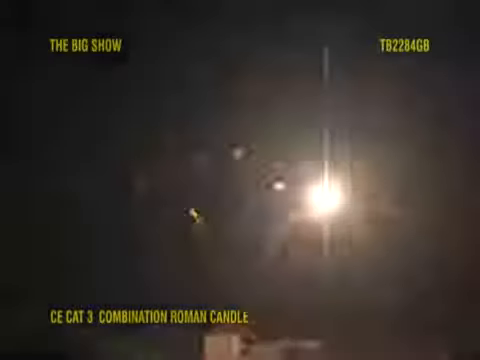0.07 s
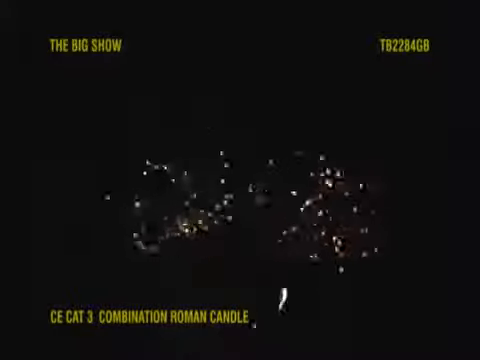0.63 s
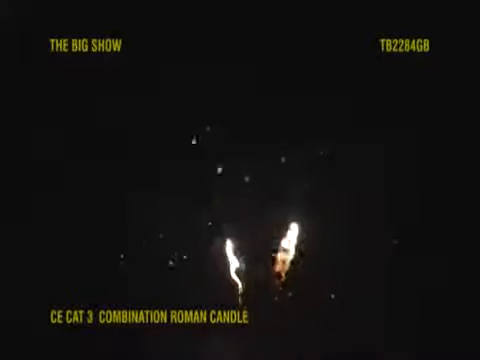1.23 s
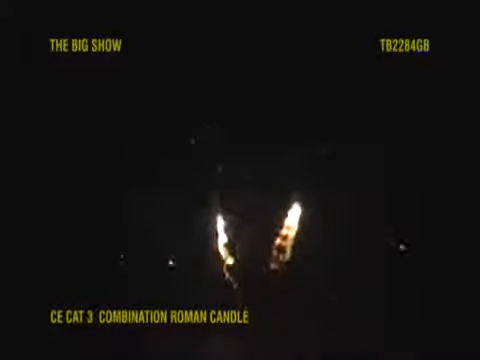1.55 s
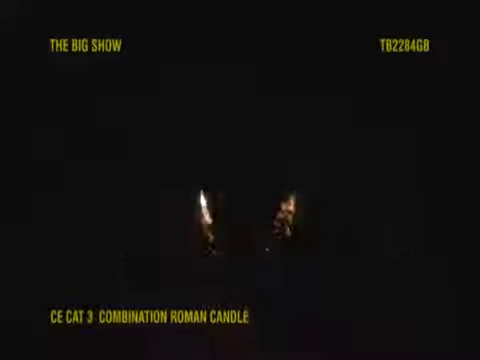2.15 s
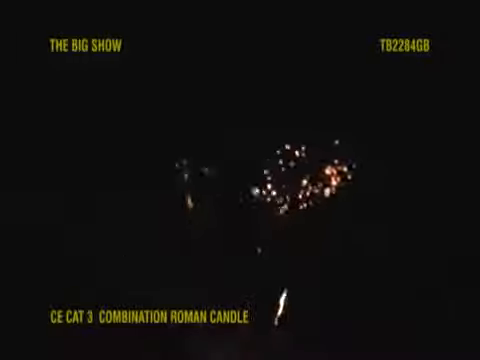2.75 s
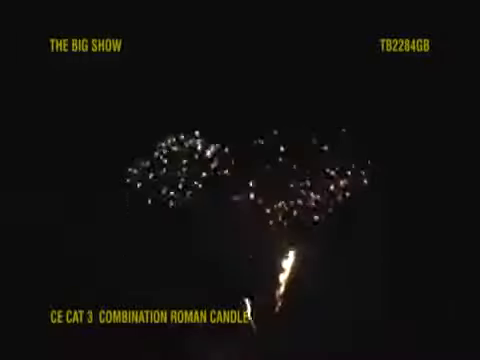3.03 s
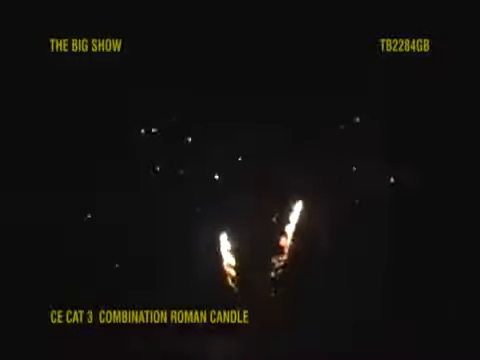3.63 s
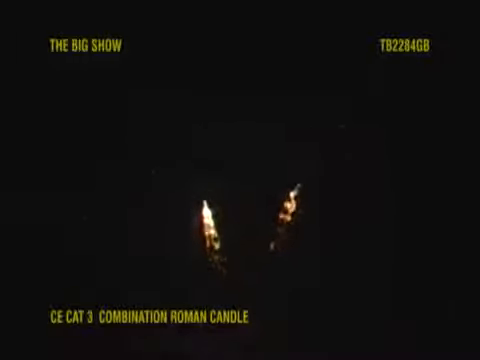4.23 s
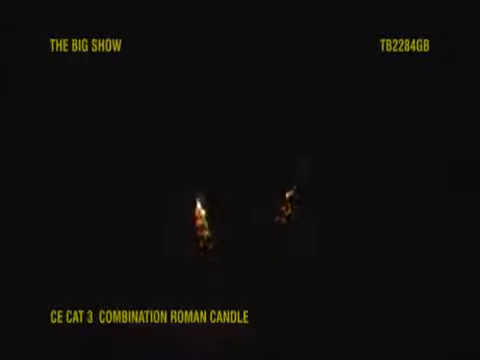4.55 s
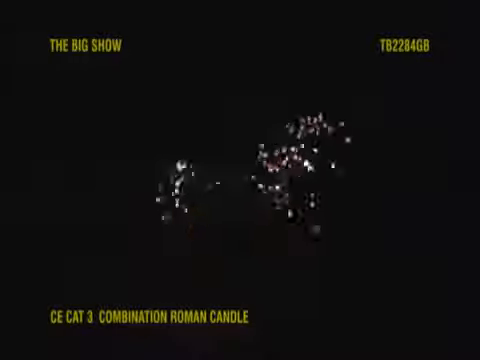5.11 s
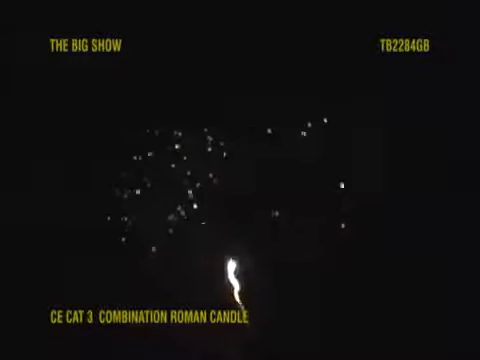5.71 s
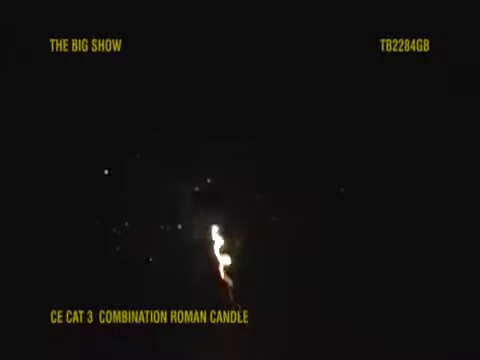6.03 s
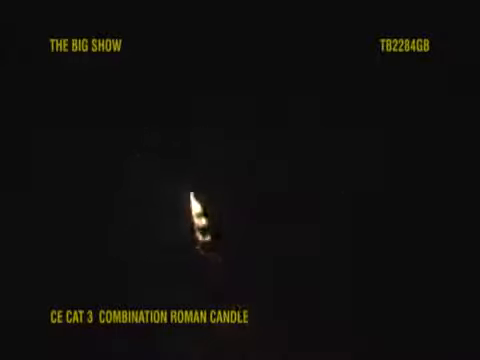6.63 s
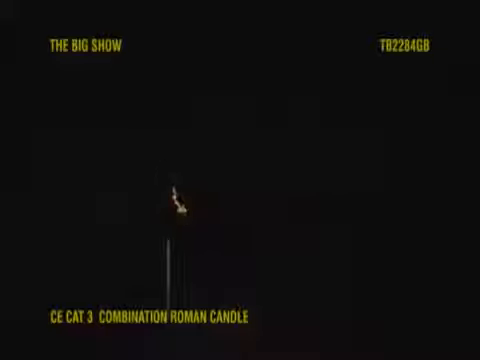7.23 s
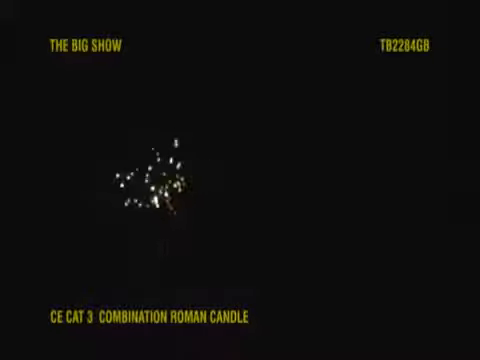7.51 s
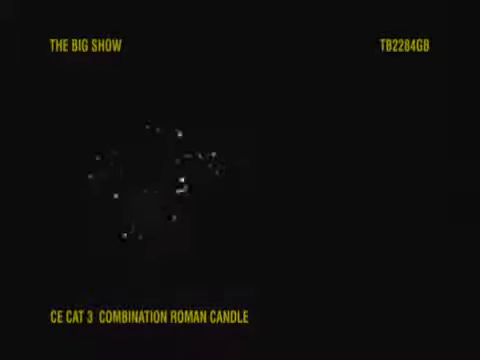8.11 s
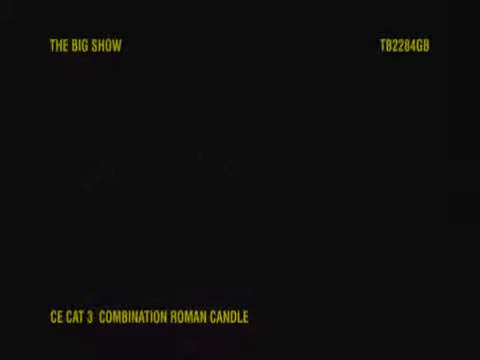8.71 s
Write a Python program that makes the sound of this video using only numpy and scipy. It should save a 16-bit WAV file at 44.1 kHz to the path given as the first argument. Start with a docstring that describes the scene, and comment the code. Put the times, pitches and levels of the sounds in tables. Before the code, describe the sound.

Roman candles fire outdoors over a light, low wind rumble on the microphone. At about 0.4 seconds two sharp bangs land almost together, overloading the microphone and rolling away with echoes from trees and distant buildings. A duller launch thump follows at 0.7, a couple of pops near 1, then the soft fizz of climbing sparks. Another launch thump at 2.6 leads into two hard bangs at 2.7 and 2.9, and the fizz returns, thinning to ticks. A third pair cracks at 5.0 and 5.2, followed by a thump at 5.3 and small pops. Sparks fizz again from about 6 to 7 seconds. One last loud bang comes at 7.6, its echo slapping back near 8.4 and fading into the open air. A small animal chirps very faintly and high around 4.8, 7.1 and 8.7 seconds.

```python
"""Roman candles over a night field

Shots thump out of their tubes, climb on fizzing tails and burst. Each burst and its ground bounce
overload the microphone, then roll back from trees, buildings and hills.
Light wind rumbles underneath, and some small animal chirps faintly in the lulls."""
import sys
import numpy as np
from scipy import signal
from scipy.fft import rfft, irfft, next_fast_len
from scipy.io import wavfile

SR = 44100
rng = np.random.default_rng(int(sys.argv[2]) if len(sys.argv) > 2 else 0)


def wav_out(sig):
    """Save sig, one row per channel (or a flat mono array), as 16-bit PCM at SR to the path in sys.argv[1]."""
    wavfile.write(sys.argv[1], SR, np.round(np.clip(np.atleast_2d(sig).T, -1, 1) * 32767).astype(np.int16))


N = 395136

# Shells bursting overhead: t/s, blast/dB, ground bounce lag/ms, roll/dB, tree delay/s, tree echo/dB,
# send to near walls/dB, to middle wall/dB, to far walls/dB, extra lag of middle and far echoes/s
BURSTS = [(0.3813, 14.5, 4.24, -.5, 0.25, -17.5, -0.5, -2, -0.5, 0),
          (0.4436, 19, 3.95, -2, 0.28, -20, -21, -18, -13, 0.025),
          (2.7253, 14.5, 4.5, 0, 0.33, -20, -0.5, -12, -1.5, .027),
          (2.8974, 22, 4.15, -1, 0.29, -17, -7, -20, -18, .02),
          (4.9875, 20, 4.4, 1.5, .328, -29, 1.5, 3, -3, .039),
          (5.2116, 18, 4.2, -1, 0.27, -16.5, -19, -21, -6, .008),
          (7.562, 22, 4.55, -1, 0.33, -16, -10, -1.5, 0, .042)]
# Lift charges firing in the tubes: t/s, blast/dB, roll/dB, roll tilt/(dB per octave)
LIFTS = [(0.6953, -2, -7, -2), (2.6023, 3.5, -9, 0), (5.328, -2, -15.5, -2.5)]


def from_db(db):
    """Decibels to gain."""
    return 10 ** (np.asarray(db) / 20)


def rms_one(x):
    """Scale to unit power."""
    return x / np.sqrt(np.mean(x ** 2) + 1e-20)


def add(out, s, sound):
    """Mix a sound in at s seconds."""
    at = max(round(s * SR), 0)
    out[at:at + len(sound)] += sound[:max(N - at, 0)]


def seconds(count):
    """Time axis of so many samples."""
    return np.arange(count) / SR


def at_hz(points, hz):
    """Read an EQ curve on a log-frequency axis."""
    f, db = np.transpose(points)
    return np.interp(np.log(hz + 1), np.log(f), db)


def coloured(x, spectrum):
    """EQ a white signal, keeping its power."""
    size = next_fast_len(len(x))
    gain = rms_one(from_db(at_hz(spectrum, np.linspace(0, SR / 2, size // 2 + 1))))
    return irfft(rfft(x, size) * gain, size)[:len(x)]


def butter(x, hz, kind, order=2):
    """Causal low-, high- or band-pass."""
    return signal.sosfilt(signal.butter(order, np.clip(hz, 10, .45 * SR), kind, fs=SR, output="sos"), x)


def scatter(count, spread_db):
    """Grainy white noise: many arrivals of uneven strength."""
    return rms_one(rng.standard_normal(count) * from_db(spread_db * rng.standard_normal(count)))


def flutter(count, per_s, depth_db):
    """A gain that wanders at random."""
    knots = rng.standard_normal(4096)
    return rms_one(from_db(depth_db * np.interp(seconds(count) * per_s, np.arange(len(knots)), knots)))


def swell(t, centre_s, spread_s):
    """A bell-shaped rise and fall."""
    return np.exp(-((t - centre_s) / spread_s) ** 2)


def night_air(wind_trim_db=4.5, hum_db=-40):
    """The bed: lumpy wind on the microphone over the far, steady hum of the countryside."""
    # Fader ride of the breeze: t/s, relative level/dB
    breeze = [(0.0, -28.5), (0.55, -36.5), (1.87, -32), (2.19, -35.5), (5.61, -41), (5.89, -36),
              (6.86, -38), (7.78, -31), (8.96, -33.5)]
    # Wind rumble EQ: f/Hz, level/dB
    wind_colour = [(12, -6.5), (28, 4), (45, 3), (80, -2), (125, -10), (200, -18.5), (400, -69)]
    # Countryside hum EQ: f/Hz, level/dB
    hum_colour = [(100, 2.5), (200, -1), (520, 2.5), (720, -3), (950, -7.5), (1300, -4), (2000, -14),
                  (3500, -18.5), (5000, -31.5), (6600, -27.5), (7500, -39), (14000, -45)]
    gusts = flutter(N, per_s=16, depth_db=2)
    ride = from_db(wind_trim_db + np.interp(seconds(N), *np.transpose(breeze)))
    wind = coloured(rng.standard_normal(N), wind_colour) * gusts * ride
    return wind + from_db(hum_db) * coloured(rng.standard_normal(N), hum_colour)


def chirps(start_hz=7250, end_hz=6200, length_s=0.0084):
    """A small animal repeats tiny falling whistles at an even pace."""
    # Bouts of chirping: start/s, end/s, repeat/s, level/dB
    bouts = [(4.814, 5.0, .125, -53), (7.081, 7.5, .13, -55), (8.712, 9.0, .1145, -54)]
    out = np.zeros(N)
    progress = np.linspace(0, 1, round(length_s * SR))
    pitch_hz = start_hz + (end_hz - start_hz) * progress
    whistle = np.sin(2 * np.pi * np.cumsum(pitch_hz) / SR) * np.sin(np.pi * progress)
    for first, end, repeat, db in bouts:
        for s in np.arange(first, end, repeat):
            add(out, s, from_db(db) * whistle)
    return out


def comets(full_db=-50, full_per_s=2000, thinning=2.2, trim_db=3, size_spread_db=3):
    """Climbing shells trail a dense fizz of sparks that thins to separate ticks as the tail burns out."""
    # Tails flaring up and dying down: peak t/s, length/s, flame level/dB
    flares = [(1.6, 1.98, -45), (3.751, 2.1, -47), (5.933, 0.19, -45), (6.44, .95, -47.5),
              (6.996, 0.31, -51)]
    # Spark fizz EQ: f/Hz, level/dB
    fizz_colour = [(500, -40), (1500, -2), (3500, 10), (5000, 2), (7000, -2.5), (10000, -15.5),
                   (14000, -31)]
    flame = np.zeros(N)
    for s, length, db in flares:
        burnt = np.linspace(0, 1, round(length * SR))
        add(flame, s - length / 2, from_db(db) * np.abs(np.sin(np.pi * burnt)))
    flame = flame * flutter(N, per_s=70, depth_db=1.3) + 1e-9   # the flame sputters
    chance = np.minimum(full_per_s * (flame / from_db(full_db)) ** thinning / SR, 1)
    sizes = rms_one(from_db(size_spread_db * rng.standard_normal(N))) * rng.choice([-1, 1], N)
    sparks = (rng.random(N) < chance) * sizes / np.sqrt(chance)   # equal power at any density
    return coloured(sparks * flame * from_db(trim_db), fizz_colour)


def spits(trim_db=7, band_hz=(3500, 8000)):
    """Lone sparks that snap louder than the rest."""
    # Spark snaps: t/s, relative level/dB
    snaps = [(2.284, -30), (2.408, -29), (4.6795, -25), (7.1551, -32), (7.1945, -33), (8.3574, -26)]
    out = np.zeros(N)
    for s, db in snaps:
        add(out, s, from_db([db + trim_db]))
    return butter(out + 1e-18, band_hz, "band")


def slap(crack_db, thud_db, decay_s, front=11, crack_hz=(750, 4200), thud_hz=(220, 680)):
    """One short report: a sharp front, then a smear from rough walls and branches."""
    t = seconds(count=4096)
    fade = np.exp(-t / decay_s)
    spike = front * signal.unit_impulse(len(t), round(0.000984 * SR))
    crack = butter(scatter(len(t), spread_db=0) * fade + spike, crack_hz, "band")
    air_hz = 6500 * 2 ** (crack_db / 10)   # faint ones come from afar, dulled
    crack = butter(crack, air_hz, "low")
    thud_fade = fade ** (1 / 2.65)   # the thud outlasts the crack
    thud = butter(rng.standard_normal(len(t)) * thud_fade, thud_hz, "band")
    return from_db(crack_db) * crack / np.abs(crack).max() + from_db(thud_db) * thud / np.abs(thud).max()


def pops():
    """Lone pops between the bursts, from stray stars or odd echoes."""
    # Lone pops: t/s, crack/dB, thud/dB
    lone_pops = [(.017, -22.5, -23), (.145, -29, -28), (0.9599, -6, -12), (.9903, -11, -8),
                 (2.868, -3, -10), (5.5927, -4, -9.5), (5.8289, -10, -24), (7.098, -30, -40),
                 (7.269, -31, -36), (8.344, -17, -17.5), (8.499, -28, -19), (8.875, -34, -21)]
    out = np.zeros(N)
    for s, crack_db, thud_db in lone_pops:
        add(out, s, slap(crack_db, thud_db, decay_s=.0045))
    return out


def echoes():
    """Slapback off fixed surfaces; a shell's place in the sky sets how strong and how late it comes."""
    # Walls near the firing site: delay/s, crack/dB, thud/dB, decay/s
    near_walls = [(.046, -6.5, -5, 0.008), (0.0849, -12, -5, 0.0021)]
    # A hard wall across the field: same columns
    middle_wall = [(.829, -11, -21, .003)]
    # Distant buildings: same columns
    far_walls = [(1.666, -22, -18.5, .006), (2.144, -27, -27, .0045)]
    # Surfaces round the tubes, returning the lift charges: same columns
    tube_walls = [(.0155, -14, -37, 0.0053), (.034, -6, -22, 0.0051), (.052, -10.5, -14, .004),
                  (.078, -8.5, -22.5, 0.0083)]
    out, sends = np.zeros(N), []
    for s, _, _, _, tree_delay, tree_db, near_db, middle_db, far_db, lag in BURSTS:
        sends += [(s, near_db, near_walls),
                  (s + lag, middle_db, middle_wall),
                  (s + lag, far_db, far_walls)]
        add(out, s + tree_delay, slap(crack_db=tree_db + 2, thud_db=tree_db + 11, decay_s=0.0034))
    sends += [(s, blast_db, tube_walls) for s, blast_db, _, _ in LIFTS]
    for s, db, walls in sends:
        for delay, crack_db, thud_db, decay_s in walls:
            add(out, s + delay, slap(db + crack_db, db + thud_db, decay_s))
    return out


def roll_envelope(t, field_hold_s=.47, field_fall_db_per_s=30):
    """Close ground, field, tree line and far hills each return their share of a bang; the powers add."""
    ground = np.exp(-t / 0.0095)
    field = from_db(-18.5 - field_fall_db_per_s * np.maximum(t - field_hold_s, 0))
    trees = from_db(-18) * swell(t, centre_s=0.268, spread_s=0.058)
    hills = from_db(-34) * swell(t, centre_s=1.14, spread_s=0.57)
    return np.sqrt(ground ** 2 + field ** 2 + trees ** 2 + hills ** 2)


def roll(tilt_db, air_db_per_s=18, air_hz=8000, bass_db_per_s=4, bass_hz=200):
    """Countless reflections off the land; the later they come, the more treble the air has taken."""
    # EQ of the rolling tail: f/Hz, level/dB
    roll_colour = [(40, -43), (110, -6), (210, -6.5), (340, -2.5), (560, -3.5), (730, -7.5), (950, -13.5),
                   (1350, -10.5), (2000, -14), (3600, -13.5), (4600, -19.5), (7000, -24), (10000, -34.5),
                   (15000, -48)]
    t = seconds(count=114688)
    arrivals = scatter(len(t), spread_db=2) * flutter(len(t), per_s=93, depth_db=2.08)
    arrivals *= flutter(len(t), per_s=30, depth_db=1.17)   # they come in lumps
    hz, age, frames = signal.stft(arrivals, SR, nperseg=1024)
    octaves_up = np.log2(np.maximum(hz, 300) / 300)
    colour = rms_one(from_db(at_hz(roll_colour, hz) + tilt_db * octaves_up))
    air_loss = air_db_per_s * (hz / air_hz) ** 1.25
    bass_sustain = bass_db_per_s / (1 + (hz / bass_hz) ** 2)
    damping = from_db(-np.outer(air_loss - bass_sustain, age))
    _, tail = signal.istft(frames * colour[:, None] * damping, SR)
    return tail[:len(t)] * roll_envelope(t)


def boom(delay_s, echo_db, near_db=-11, near_decay_s=0.053, low_hz=(190, 620), rustle_hz=(1100, 4200)):
    """A burst's low body returns at once from close by, then off the tree line with a grainy rustle."""
    t = seconds(count=24000)
    near = from_db(near_db) * np.exp(-t / near_decay_s)
    far = from_db(echo_db) * swell(t, delay_s, spread_s=0.054)
    body = rms_one(butter(rng.standard_normal(len(t)), low_hz, "band")) * (near + far)
    twigs = scatter(len(t), spread_db=7) * flutter(len(t), per_s=280, depth_db=5)
    rustle = rms_one(butter(twigs, rustle_hz, "band", order=4)) * swell(t, delay_s, spread_s=0.055)
    return body + from_db(echo_db - 7) * rustle


def muzzle(mix_db=-6, decay_s=0.00044, band_hz=(2200, 7000)):
    """Gas tearing out of the tube mouth."""
    t = seconds(count=1024)
    gas = rms_one(butter(rng.standard_normal(len(t)), band_hz, "band"))
    return from_db(mix_db) * gas * np.exp(-t / decay_s)


def casing(mix_db=-20, decay_s=.0045, band_hz=(1100, 4000)):
    """The shell's case tears open: a ragged crack riding on the shock wave."""
    t = seconds(count=2048)
    rip = rms_one(butter(scatter(len(t), spread_db=4.5), band_hz, "band"))
    return from_db(mix_db) * rip * np.exp(-t / decay_s)


def blast(length_ms, bounce_ms, bounce_db=-2, ring_hz=280, ring_q=1.29, low_cut_hz=50, grit=0.099):
    """An N-shaped shock wave and its ground bounce; the microphone's bass cut makes them ring briefly."""
    t = seconds(count=4096)
    age = t * 1000 / length_ms
    shock = (1 - 2 * age) / (1 + age ** 12)
    shock *= 1 + grit * rng.standard_normal(len(t))   # the front is ragged
    bounce = from_db(bounce_db) * np.interp(t - bounce_ms / 1000, t, shock, left=0)
    w = 2 * np.pi * ring_hz
    resonant_high_pass = signal.bilinear([1, 0, 0], [1, w / ring_q, w * w], SR)
    swing = signal.lfilter(*resonant_high_pass, shock + bounce)
    return butter(swing, low_cut_hz, "high", order=1)


def bangs():
    """The hero hits: short, hard bursts in the air and longer thumps from the tubes, with their tails."""
    out = np.zeros(N)
    for s, blast_db, bounce_ms, roll_db, tree_delay, tree_db, *_ in BURSTS:
        add(out, s, from_db(blast_db) * blast(length_ms=1.82, bounce_ms=bounce_ms))
        add(out, s, from_db(blast_db) * casing())
        add(out, s, from_db(roll_db) * roll(tilt_db=0))
        add(out, s, boom(tree_delay, tree_db))
    for s, blast_db, roll_db, tilt_db in LIFTS:
        add(out, s, from_db(blast_db) * blast(length_ms=3.0, bounce_ms=0.47))
        add(out, s, from_db(blast_db) * muzzle())
        add(out, s, from_db(roll_db) * roll(tilt_db))
    return out


def scene():
    """The mono mix at the microphone."""
    return (bangs() + echoes() + pops() + comets() + spits() + chirps() + night_air())[None]


def record(dry, dull_hz=12500, cutoff_hz=15200):
    """The microphone dulls the highest treble, the blasts clip flat, and a steep low-pass cuts the top."""
    clipped = np.clip(butter(dry, dull_hz, "low", order=4), -.99, .99)
    return signal.sosfilt(signal.ellip(10, .1, 90, cutoff_hz, fs=SR, output="sos"), clipped)


dry = scene()
out = record(dry)
wav_out(out)
```